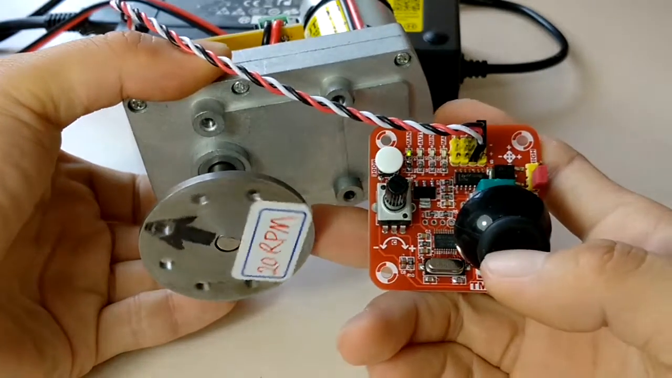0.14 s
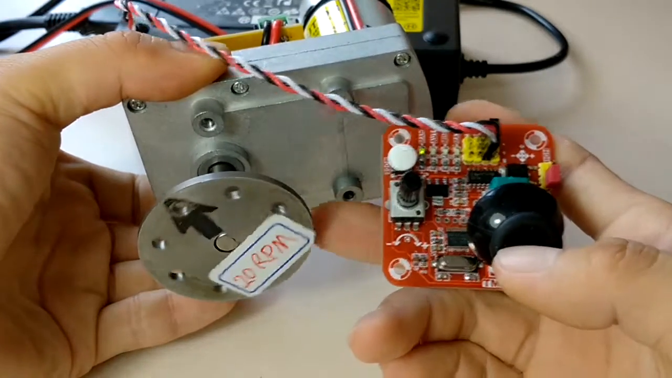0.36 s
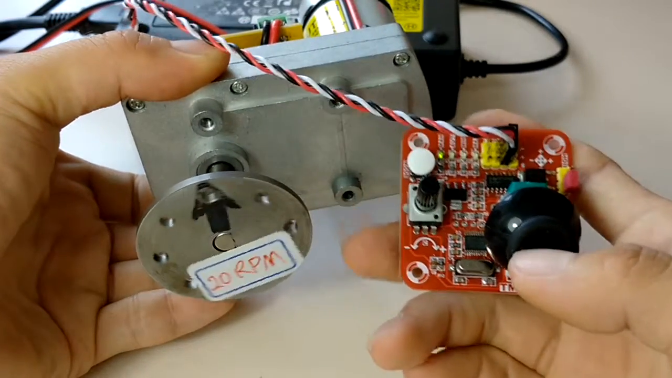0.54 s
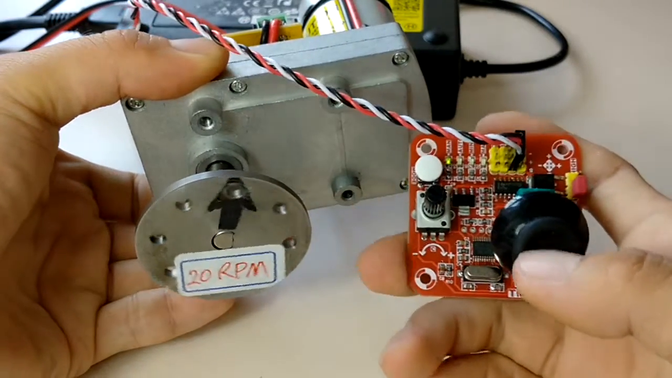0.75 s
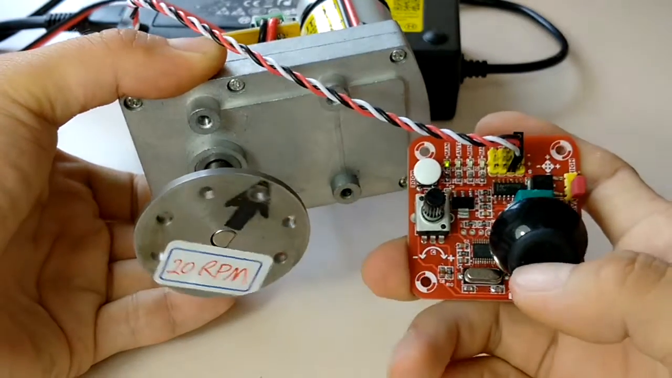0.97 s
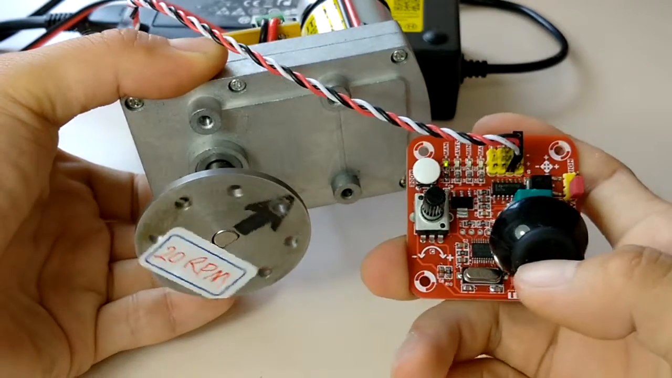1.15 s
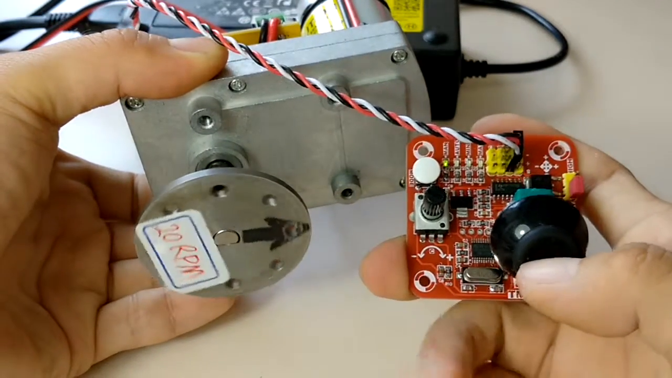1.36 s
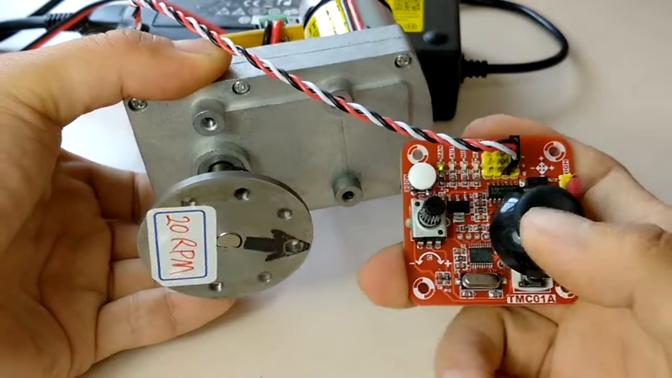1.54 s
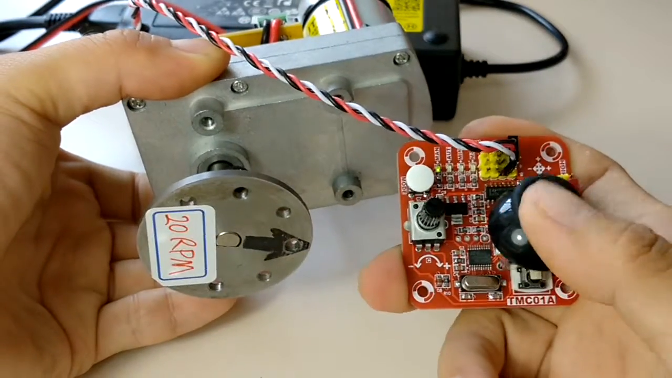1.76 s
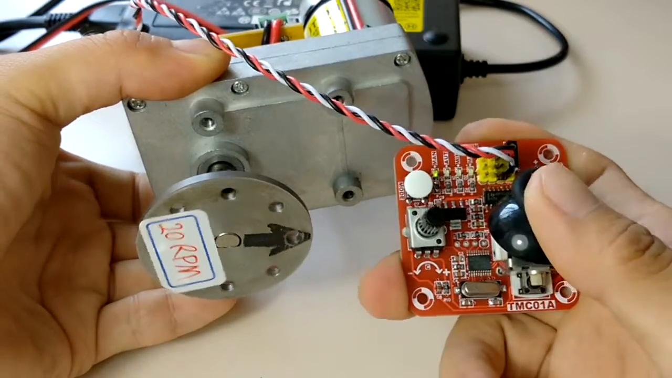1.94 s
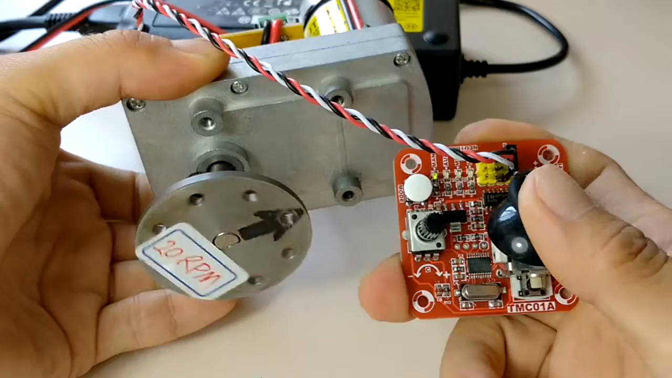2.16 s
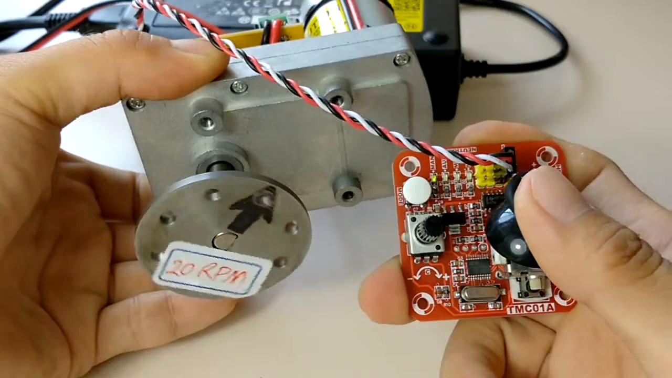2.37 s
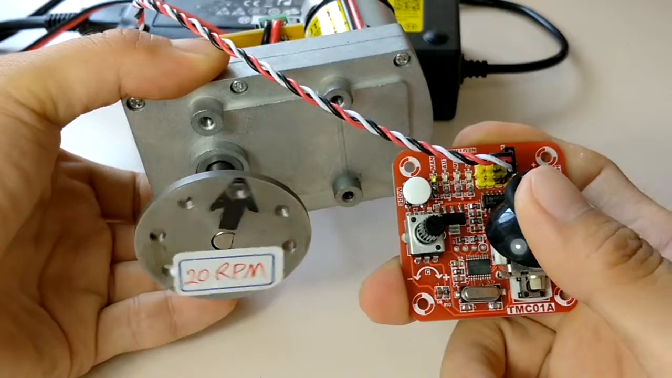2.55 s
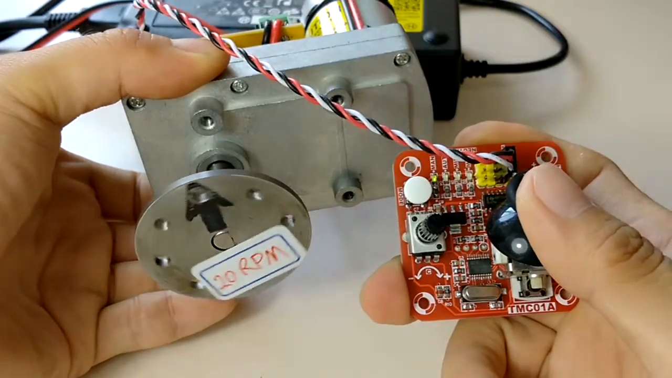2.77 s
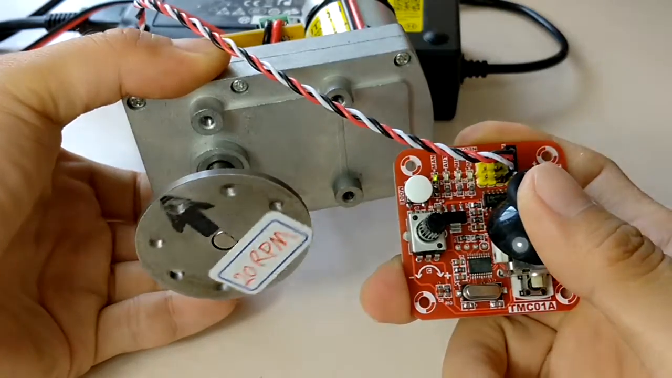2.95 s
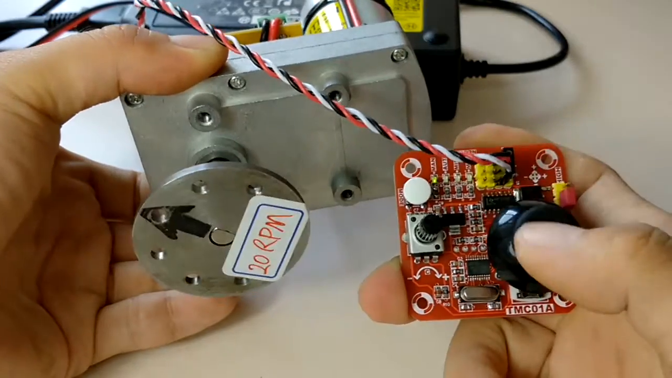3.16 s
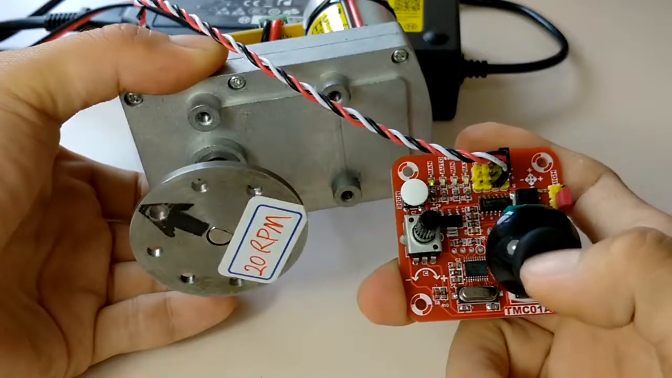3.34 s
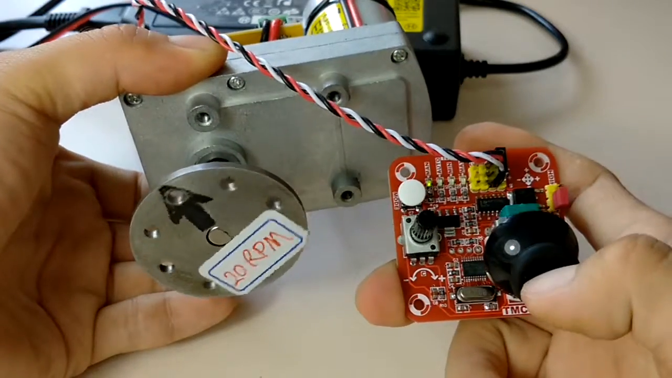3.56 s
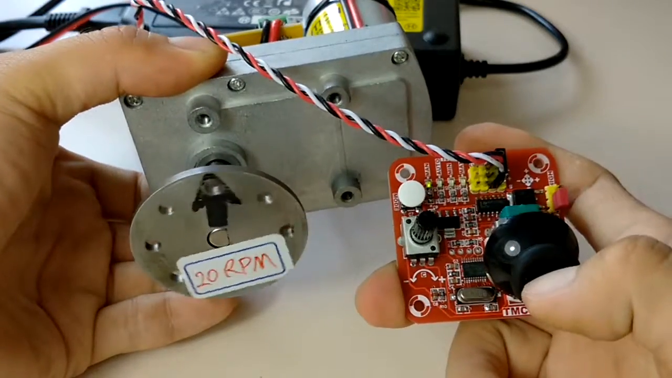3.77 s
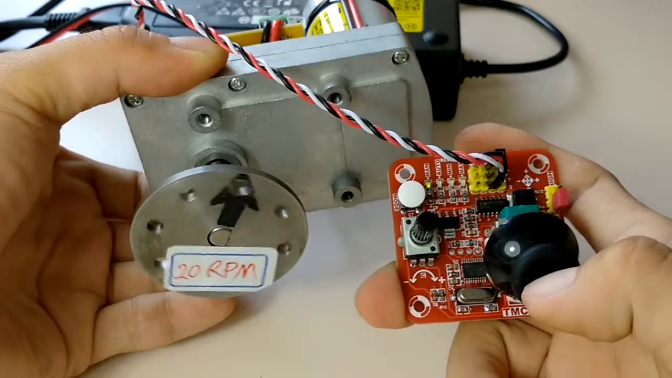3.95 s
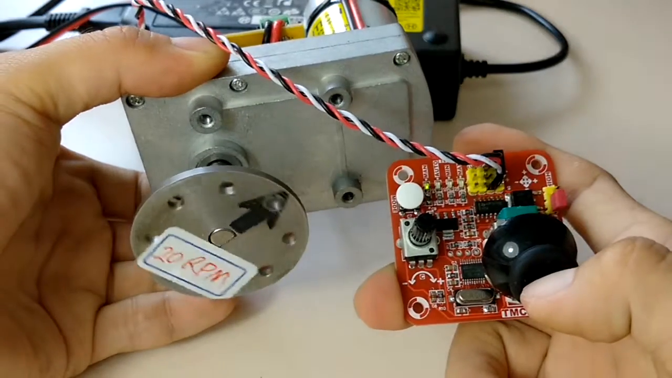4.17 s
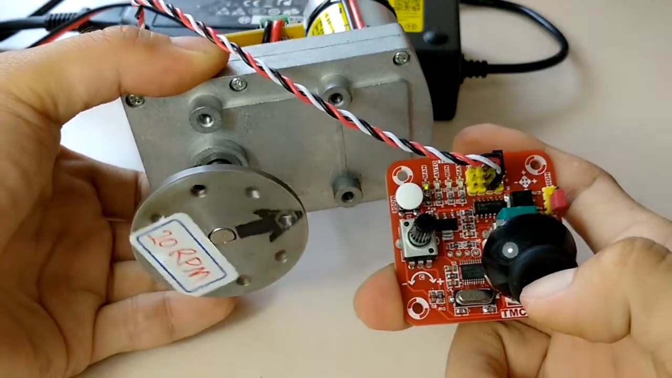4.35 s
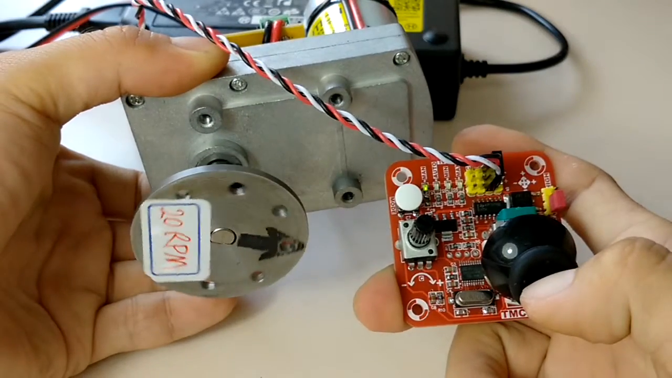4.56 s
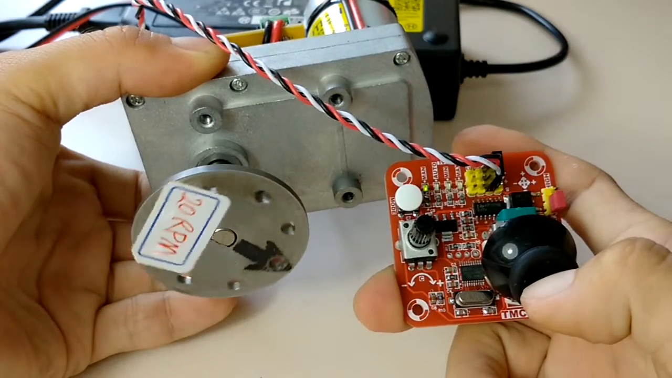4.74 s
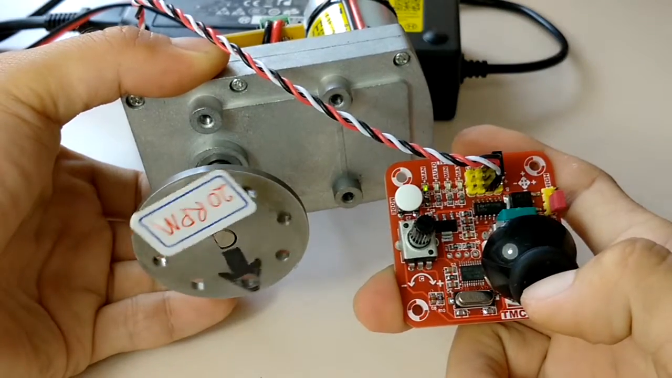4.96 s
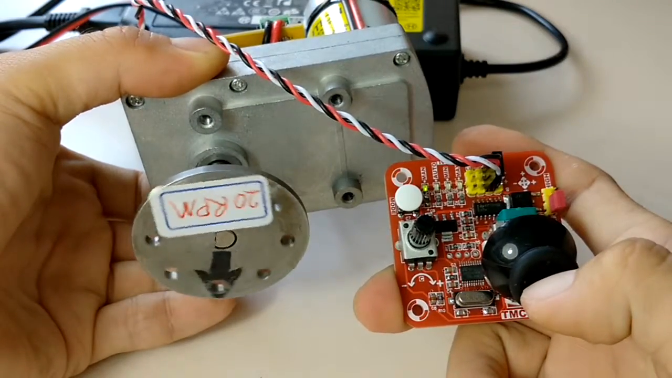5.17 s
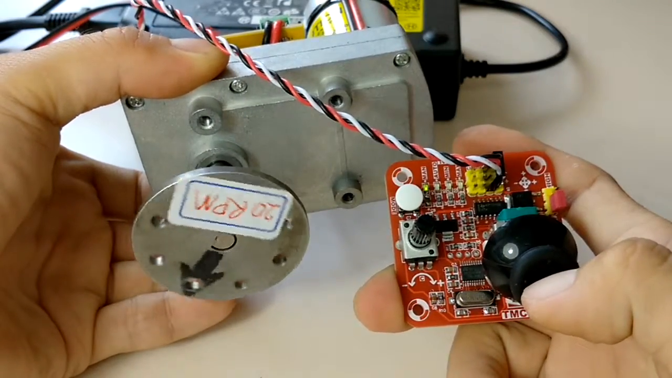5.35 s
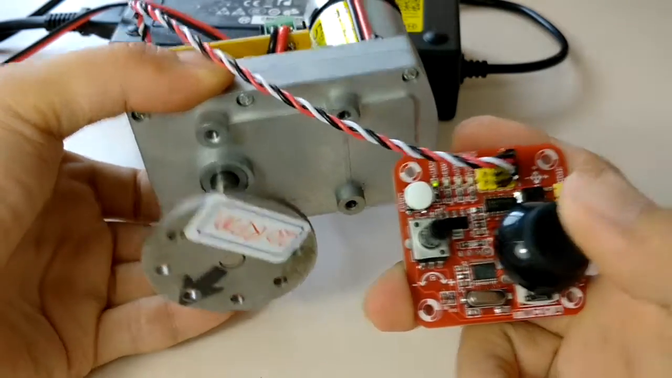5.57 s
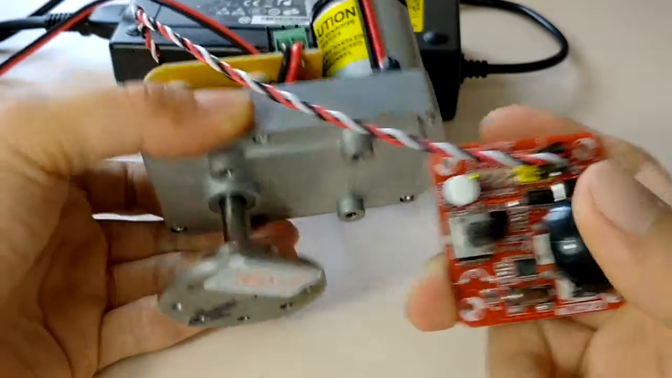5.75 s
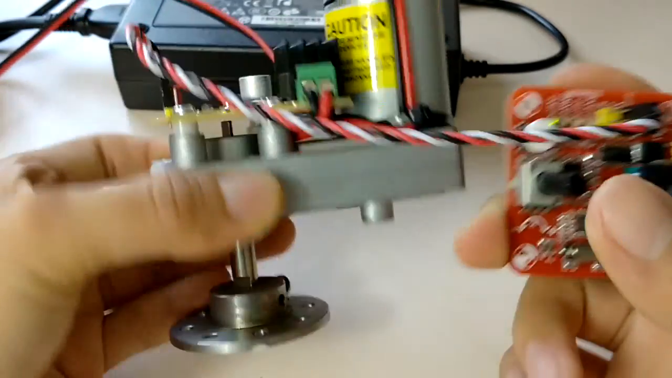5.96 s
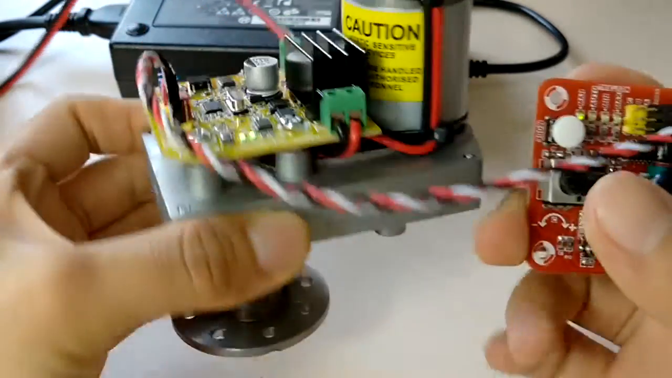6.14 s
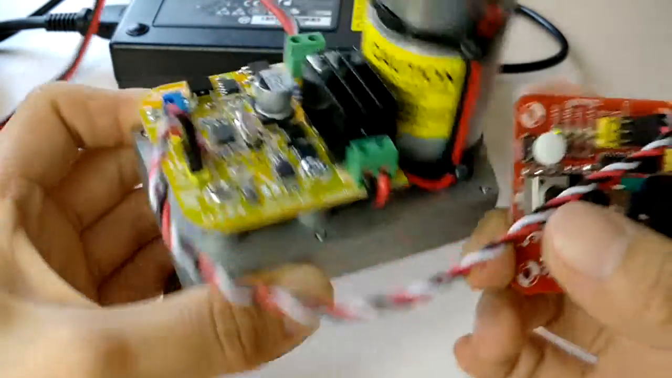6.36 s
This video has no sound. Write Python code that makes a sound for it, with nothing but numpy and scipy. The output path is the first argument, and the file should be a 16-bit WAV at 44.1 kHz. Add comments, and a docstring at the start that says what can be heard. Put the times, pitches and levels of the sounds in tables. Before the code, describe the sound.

Three bursts of a small geared motor, close and dry: a steady metallic whine with bright, gritty brush hiss and light gear rattle. The first dips in speed partway, the second starts more gradually and is quieter, the third is sharper with a thin squeak. Every burst slides down fast to a short pause. Soft thuds mark two stops. Afterwards only quiet room rumble, wavering hum and faint hiss remain, with a small hand-held click.

```python
"""A small brushed gearmotor, held in the hand close to the stereo microphone, is jogged by a joystick:
forwards with one sag in speed, backwards, then forwards again. Its five-slot rotor whines in tones locked
to its angle, the brushes sizzle on the commutator as coloured noise with sparks, and the gear teeth
chatter as noise bursts ringing the metal case. Dull knocks follow two of the releases; late on, a part
ticks in the hand. A quiet room lies behind: low rumble, faint hiss and a wavering hum."""
import sys
import numpy as np
from scipy import signal
from scipy.fft import rfft, irfft
from scipy.io import wavfile
from scipy.ndimage import map_coordinates

SR = 44100
rng = np.random.default_rng(int(sys.argv[2]) if len(sys.argv) > 2 else 0)


def unload_wav(signal):
    """Save mono or channel-first audio to the path in sys.argv[1] as 16-bit WAV at rate SR, clipped to [-1, 1]."""
    wavfile.write(
        sys.argv[1],
        SR,
        np.round(np.clip(np.atleast_2d(signal).T, -1, 1) * 32767).astype(np.int16),
    )


N = 282680
TIME = np.arange(N) / SR  # seconds
FREQS = np.maximum(np.arange(N // 2 + 1) * SR / N, 1)  # Hz, kept above 0 for the logarithm

# Pushes of the joystick. Each row: start in seconds, push length in seconds, release in seconds,
# let-go length in seconds, 1 if backwards, brush level in dB, gear level in dB, gear fade in dB per second,
# brake rattle in dB, treble singing in dB, squeak in dB relative to the sizzle.
JOYSTICK_RUNS = [(-.2, .1, 1.508, .084, 0, -37.5, -47.5, 1.5, 0, -3.5, -27),
                 (1.812, .21, 3.105, .081, 1, -41.5, -48.5, 1.7, 5, 0.5, -40),
                 (3.329, .129, 5.46, .04, 0, -38, -47.5, 4, 9.5, 1.2, -9)]
# The thumb eases off once in the first run. Each row: time in seconds, share of full drive.
THUMB_EASE = [(.615, 1), (.699, .713), (.937, .552), (.976, 1)]
# Tones locked to the rotor. Each row: cycles per revolution, base level forwards in dB,
# base level backwards in dB, left over right in dB.
ROTOR_TONES = [(4, -74, -74, -4), (5, -59, -52, 0), (6, -76, -72, 5), (9, -70, -86, 1), (10, -61, -54, -1),
               (11, -75, -78, 2), (23, -61, -60, -12), (25, -64, -60, 1), (26, -65, -57, 4),
               (30, -66, -58, 2), (35, -66, -64, 2), (39, -61, -64, -3), (40, -59, -57, 0),
               (45, -55, -49, 5), (50, -45, -56, 14), (53, -53, -71, 11), (54, -56, -55, 14),
               (55, -57, -51, 7), (59, -55, -60, 9), (60, -52, -56, 8), (64, -55, -63, 4),
               (65, -51, -56, 7), (66, -62, -53, 10), (70, -47, -63, 7), (74, -61, -58, 4),
               (75, -53, -59, 5), (76, -57, -68, 4), (78, -55, -65, 3), (90, -55, -61, -7),
               (95, -56, -58, -3)]
# Lift of the low slot tones when running forwards. Each row: time in seconds, lift in dB.
SLOT_LIFT = [(.4, -6), (1.1, -8.5), (3.9, -8), (4.1, -2)]
# Colour of the brush sizzle. Each row: frequency in Hz, forwards in dB, backwards in dB,
# left over right in dB.
BRUSH_COLOUR = [(500, -30.5, -37, -1), (1120, -16.5, -24.5, 2.5), (2100, -15.5, -24, -0.5),
                (4330, -12.5, -19, -2), (5090, -9, -18.5, 4.5), (5860, -3.5, -10, -1), (6320, -4, -8, 2),
                (7000, -2, -9, 10.5), (8050, 0, -9.5, 4.5), (9470, -0.5, -8, 11.5),
                (11470, -7.5, -14, -2.5), (12500, -6, -15.5, 2), (14400, -12.5, -18, -10)]
# Resonances of the brush holder. Each row: frequency in Hz, half-width in Hz, forwards lift in dB,
# backwards lift in dB.
BRUSH_HOLDER_MODES = [(5370, 47, 6.5, 3), (6600, 150, 0, -3), (7200, 100, 6, 2), (8050, 120, 3.5, 1.5),
                      (8900, 78, 3, 1.5), (9500, 120, 2, 2), (11600, 110, 7, 0)]
# Resonances of the gear case. Each row: frequency in Hz, width in Hz, forwards in dB, backwards in dB.
GEAR_CASE_MODES = [(842, 100, -13, -24), (2492, 110, -2.5, -6), (2598, 100, -3.5, -15),
                   (2823, 77, -5.5, -14), (3005, 58, -6, -5.5), (3258, 120, -2, -2.5), (3430, 83, 0.5, 2.5),
                   (3770, 125, -6, -6.5), (4377, 130, -6.5, -7.5), (4726, 99, -5, -15)]
# The gear train takes up its slack on braking. Each row: time in seconds, strike level in dB.
SLACK_KNOCKS = [(1.535, -48), (5.47, -46)]
# Ring of that knock. Each row: frequency in Hz, level in dB, time to fall by 60 dB in seconds.
KNOCK_RING = [(625, 4, 0.075), (763, 0.5, 0.14), (840, 4, 0.045), (1246, -6, 0.045)]
# A small tick as the parts are turned in the hand. Each row: time in seconds, strike level in dB.
HAND_TICKS = [(6.0665, -42)]
# Room background. Each row: frequency in Hz, level in dB per Hz.
ROOM_COLOUR = [(10, -90), (25, -81), (50, -76), (78, -83), (150, -82), (240, -79), (480, -89), (700, -87),
               (1100, -95), (2000, -100), (3500, -104), (6000, -106), (9500, -102), (14000, -103)]
# Tones of the room. Each row: frequency in Hz, level in dB relative to DEEP_HUM_DB.
ROOM_TONES = [(48.8, 0), (100, -11), (200, -9.5)]
# Likeness of the room in the two channels. Each row: frequency in Hz, likeness from 0 to 1.
ROOM_SHARED = [(60, 0.75), (290, 0.98), (620, 0.3), (1400, 0.03), (6000, 0)]

# rotor speed at full drive, in revolutions per second
FORWARD_RPS, BACKWARD_RPS = 148.85, 146.4
INERTIA_S = .029  # time constant with which the rotor follows the drive
SLOT_BACKWARD_DB = 1.6  # lift of the low slot tones backwards
# running forwards, the case rings when the slot tone glides through this resonance
CASE_RING_HZ, CASE_RING_WIDTH_HZ, CASE_RING_DB = 638, 37, 17
# friction grows with speed by these powers
BRUSH_POWER, GEAR_POWER = 1.12, 0.87
# sparks at the brushes: mean rate, decay constant, size relative to the steady contact
SPARKS_PER_S, SPARK_DECAY_S, SPARK_DB = 130, 0.0045, -13.5
BRAKE_RATTLE_S = 0.023  # on release the teeth change flanks and rattle for about this long
DEEP_HUM_DB = -59
CUTOFF_HZ = 14250


def rotor_speed():
    """The joystick ramps the drive up and down; the rotor, already running, follows with a lag."""
    drive = np.zeros(N)
    for start, push, release, let_go, backwards, *_ in JOYSTICK_RUNS:
        rise, fall = (TIME - start) / push, 1 - (TIME - release) / let_go
        held = np.clip(np.minimum(rise, fall), 0, 1)
        drive += held * (BACKWARD_RPS if backwards > .5 else FORWARD_RPS)
    drive *= in_time(THUMB_EASE)[0]
    keep = np.exp(-1 / (INERTIA_S * SR))
    lagged = signal.lfilter([1 - keep], [1, -keep], drive - drive[0])
    return np.maximum(drive[0] + lagged, 0)


def whine(turns, speed, backwards, singing_db, settled_db,
          flutter_db=2.0, rough=0.26, commutator_power=1.8, settle_share=0.53):
    """Slot and commutator tones: multiples of the rotor rate that fade quickly as it slows."""
    share = speed / speed.max()
    ringing = np.exp(-((5 * speed - CASE_RING_HZ) / CASE_RING_WIDTH_HZ) ** 2 / 2)
    forward_hum_db = in_time(SLOT_LIFT)[0] + CASE_RING_DB * ringing
    hum_db = np.where(backwards, SLOT_BACKWARD_DB, forward_hum_db)
    out = np.zeros((2, N))
    for order, forward_db, backward_db, side_db in ROTOR_TONES:
        level = np.where(backwards, from_db(backward_db) * share ** 2.7, from_db(forward_db))
        phase = 2 * np.pi * (order * turns + rng.random())
        if order < 7:
            # five slots pass the magnets: a low tone and its side tones
            level = level * share ** 4 * from_db(hum_db + .4 * drift(12))
        elif order < 12:
            # ten commutations a revolution: this tone and its side tones last longest in a glide
            commutator_db = 1.7 - settle_share * settled_db + .7 * drift(12)
            level = level * share ** commutator_power * from_db(commutator_db)
        else:
            # high tones flutter with the contact and reach left and right a quarter cycle apart
            level = level * share ** 8 * from_db(singing_db + flutter_db * drift(14))
            phase = phase + rough * drift(40) + np.array([[0], [np.pi / 2]])
        out += level * panned(side_db) * np.sqrt(2) * np.sin(phase)
    return out


def brushes(turns, backwards, worn_share=0.37, chatter_db=0.6, patchy_db=1.58):
    """Brushes scrape over five segments; the worn track repeats with every revolution."""
    worn = np.array([worn_track(turns), worn_track(turns)])
    scrape = stereo_noise(likeness=0.026) + worn_share * worn
    # the pressure changes with each segment, once a revolution, and as the springs chatter
    segments = contacts(turns, count=10, spread_db=0.5, depth=0.1)
    lopsided = 1 + .07 * np.sin(2 * np.pi * turns)
    scrape = scrape * segments * lopsided * from_db(chatter_db * drift(160))
    scrape = gritty(scrape, patchy_db)
    forward_db, backward_db, side_db = in_frequency(BRUSH_COLOUR)
    hz, width, forward_lift, backward_lift = np.array(BRUSH_HOLDER_MODES).T[:, :, None]
    peaks = 1 / (1 + ((FREQS - hz) / width) ** 2)
    forward_colour = forward_db + (forward_lift * peaks).sum(0)
    backward_colour = backward_db + (backward_lift * peaks).sum(0)
    low_cut = FREQS ** 2 / (FREQS ** 2 + 400 ** 2)
    ways = [coloured(scrape, from_db(db) * panned(side_db) * low_cut)
            for db in (forward_colour, backward_colour)]
    ahead, back = [way / band_rms(way, 5500, 13000) for way in ways]
    return np.where(backwards, back, ahead)


def worn_track(turns, size=240):
    """Roughness of the commutator, the same on every revolution, from equally strong orders."""
    track = irfft(np.exp(2j * np.pi * rng.random(size // 2 + 1)), size)
    return map_coordinates(rms_one(track), [turns % 1 * size], mode="grid-wrap")


def gritty(x, patchy_db, count=24):
    """The sizzle flickers as each narrow band of it drifts in level on its own."""
    edges = np.linspace(0, CUTOFF_HZ, count + 1)
    spectrum, step = rfft(x), edges[1]
    # overlapping triangular bands add up to the whole below the cutoff
    bands = (irfft(spectrum * np.clip(1 - np.abs(FREQS - hz) / step, 0, 1), N) for hz in edges)
    return sum(band * from_db(patchy_db * drift(22)) for band in bands)


def sparking():
    """The brushes bounce and spark at random: uneven flares that die away over steady contact, rms 1."""
    struck = rng.random(N) < SPARKS_PER_S / SR
    sparks = struck * np.minimum(rng.exponential(1, N), 3)
    keep = np.exp(-1 / (SPARK_DECAY_S * SR))
    flares = signal.lfilter([1], [1, -keep], sparks + 1e-18)
    return rms_one(1 + from_db(SPARK_DB) * flares)


def squeaks(turns, ring_hz=7280, width_hz=260, side_db=11):
    """A brush sticks and slips: noise swells unevenly once a revolution and rings its spring."""
    slips = rng.standard_normal(N) * contacts(turns, count=1, spread_db=5.2, depth=.7)
    ring = coloured(slips, 1 / (1 + ((FREQS - ring_hz) / width_hz) ** 2))
    return rms_one(ring) * panned(side_db)


def gears(turns, backwards, rattle_db=1.45):
    """Uneven tooth contacts ring the resonances of the case."""
    meshing = contacts(turns, count=5, spread_db=0.5, depth=0.35)
    teeth = stereo_noise(likeness=0.21) * meshing * from_db(rattle_db * drift(45))
    hz, width, forward_db, backward_db = np.array(GEAR_CASE_MODES).T[:, :, None]
    shapes = 1 / (1 + ((FREQS - hz) / width) ** 2) ** 2
    # the powers of the resonances add up
    ways = [coloured(teeth, np.sqrt((from_db(db) ** 2 * shapes ** 2).sum(0)))
            for db in (forward_db, backward_db)]
    ahead, back = [way / band_rms(way, 2300, 3700) for way in ways]
    return np.where(backwards, back, ahead)


def narrowed(x, corner_hz=1800, share=0.67):
    """Long waves from the motor reach left and right more alike than short ones."""
    mid = x.mean(0)
    return mid + coloured(x - mid, 1 - share / (1 + (FREQS / corner_hz) ** 4))


def knocks():
    """A dull ring of decaying sines as the gear train is braked."""
    t = TIME[:SR // 4]
    ring = sum(from_db(db - 60 * t / t60) * np.sin(2 * np.pi * hz * t) for hz, db, t60 in KNOCK_RING)
    soft_onset = 1 - np.exp(-t / 0.0049)
    return signal.fftconvolve(strikes(SLACK_KNOCKS), ring * soft_onset)[:N]


def ticks():
    """A part clicks in the hand: a bright crack of high-passed noise with a short tail."""
    t = TIME[:SR // 4]
    decay = from_db(-60 * t / .028) + from_db(-15 - 60 * t / .13)
    high_pass = signal.butter(2, 6000, "high", fs=SR, output="sos")
    burst = signal.sosfilt(high_pass, rng.standard_normal((2, len(t))) * decay)
    return signal.fftconvolve(strikes(HAND_TICKS)[None], burst, axes=1)[:, :N]


def room(waver_db=2.0, waver_rate=7):
    """Low rumble and faint hiss, more alike in both channels at the bottom, with a wavering hum."""
    (colour_db,), (likeness,) = in_frequency(ROOM_COLOUR), in_frequency(ROOM_SHARED)
    likeness = np.clip(likeness, 0, 1)
    gain = from_db(colour_db) * np.sqrt(SR) / 2  # density per Hz to gain on white noise
    mid = coloured(rng.standard_normal(N), gain * np.sqrt(1 + likeness))
    side = coloured(rng.standard_normal(N), gain * np.sqrt(1 - likeness))
    hum = np.zeros(N)
    for hz, db in ROOM_TONES:
        level = from_db(db + waver_db * drift(waver_rate))
        hum += level * np.sin(2 * np.pi * hz * TIME + .5 * drift(waver_rate))
    return mid + side * [[1], [-1]] + np.sqrt(2) * from_db(DEEP_HUM_DB) * hum


def from_db(db):
    """Decibels to gain."""
    return 10 ** (np.asarray(db) / 20)


def rms_one(x):
    """Scale to rms 1."""
    return x / np.sqrt(np.mean(x ** 2) + 1e-20)


def in_time(rows):
    """Each column of a curve at every sample."""
    s, *columns = np.transpose(rows)
    return [np.interp(TIME, s, c) for c in columns]


def in_frequency(rows):
    """Each column of a spectrum at every frequency."""
    hz, *columns = np.transpose(rows)
    return [np.interp(np.log(FREQS), np.log(hz), c) for c in columns]


def coloured(x, gain):
    """Filter by a gain per frequency."""
    return irfft(rfft(x) * gain, N)


def band_rms(x, low, high):
    """Level of the centre of a stereo sound within a band in Hz."""
    return np.std(coloured(x.mean(0), (FREQS > low) & (FREQS < high)))


def drift(rate):
    """Slow random wander of rms 1, with two new points in every 1 / rate seconds."""
    points = rng.standard_normal(int(TIME[-1] * rate * 2) + 3)
    return rms_one(np.interp(TIME * rate * 2, np.arange(len(points)), points))


def panned(side_db):
    """Left and right gains for a level difference."""
    gains = from_db(np.array([[.5], [-.5]]) * side_db)
    return gains / np.sqrt(np.mean(gains ** 2, axis=0))


def stereo_noise(likeness):
    """White noise, partly shared by both channels."""
    mid, side = rng.standard_normal((2, N))
    likeness = np.clip(likeness, -1, 1)
    shared, opposed = np.sqrt(1 + likeness) * mid, np.sqrt(1 - likeness) * side
    return (shared + opposed * [[1], [-1]]) / np.sqrt(2)


def strikes(rows):
    """One impulse for each row of seconds and dB."""
    out = np.zeros(N)
    for s, level_db in rows:
        out[int(s * SR)] = from_db(level_db)
    return out


def contacts(turns, count, spread_db, depth):
    """A swell for each of count contacts per revolution, each with a force of its own."""
    place = turns * count
    force = from_db(spread_db * rng.standard_normal(N))[place.astype(int)]
    swell = 1 + np.clip(depth, 0, 1) * np.cos(2 * np.pi * (place - .5))
    return rms_one(force * swell)


def scene(brush_waver_db=.5, gear_waver_db=0.88, waver_rate=9):
    """The rotor's angle drives the tones, the brushes and the gears; its speed sets how loud they are."""
    runs = np.array(JOYSTICK_RUNS)
    current_run = runs[np.searchsorted(runs[1:, 0], TIME)].T
    start, _, release, _, direction, brush_db, gear_db, fade_db, brake_db, singing_db, squeak_db = current_run
    backwards = direction > .5
    speed = rotor_speed()
    share = speed / FORWARD_RPS
    # the speed is less even backwards, against the set of the brushes
    unsteady = np.where(backwards, .0016, .0006) * drift(18)
    turns = np.cumsum(speed * (1 + unsteady)) / SR

    scrape = sparking() * brushes(turns, backwards) + from_db(squeak_db) * squeaks(turns)
    sizzle_db = brush_db + brush_waver_db * drift(waver_rate)
    sizzle = share ** BRUSH_POWER * from_db(sizzle_db) * scrape

    # the gears settle as a run goes on, and may rattle again when it is braked
    settled_db = fade_db * (TIME - start)
    rattle_db = brake_db * np.exp(-((TIME - release) / BRAKE_RATTLE_S) ** 2)
    mesh_db = gear_db - settled_db + rattle_db + gear_waver_db * drift(waver_rate)
    chatter = share ** GEAR_POWER * from_db(mesh_db) * gears(turns, backwards)

    tones = whine(turns, speed, backwards, singing_db, settled_db)
    motor = narrowed(sizzle + chatter) + tones + knocks()
    return motor + ticks() + room()


def record(dry):
    """The top is cut steeply by an elliptic low-pass."""
    low_pass = signal.ellip(12, .2, 80, CUTOFF_HZ, fs=SR, output="sos")
    return signal.sosfilt(low_pass, dry)


dry = scene()
out = record(dry)
unload_wav(out)
```